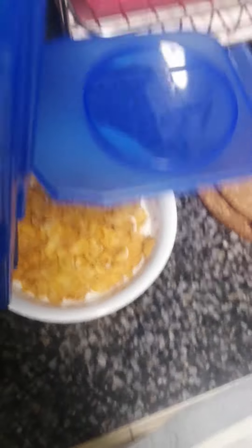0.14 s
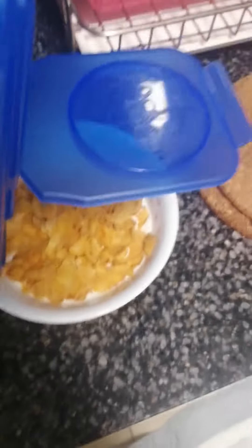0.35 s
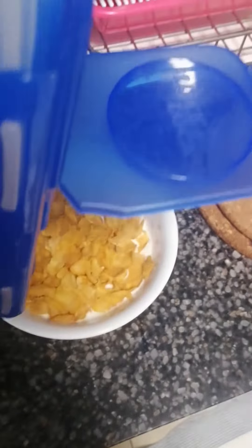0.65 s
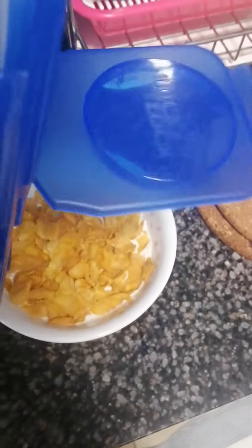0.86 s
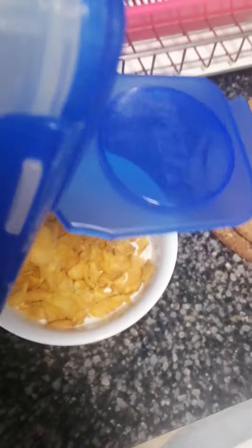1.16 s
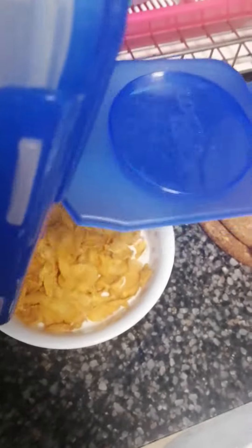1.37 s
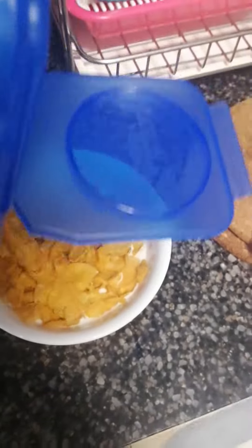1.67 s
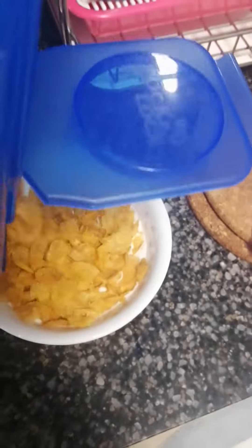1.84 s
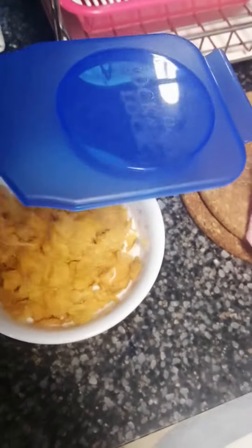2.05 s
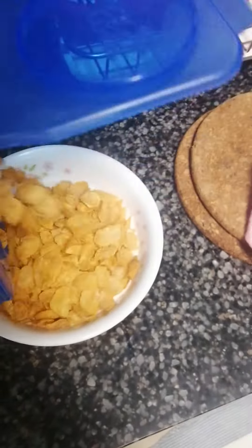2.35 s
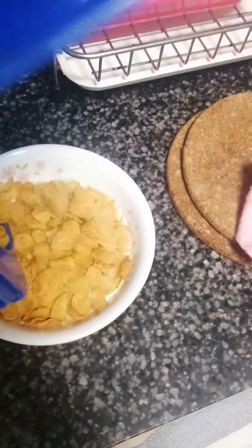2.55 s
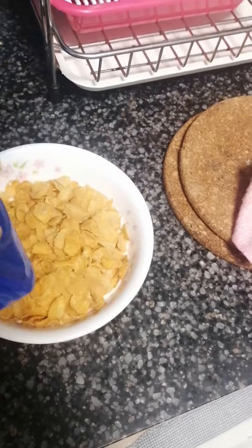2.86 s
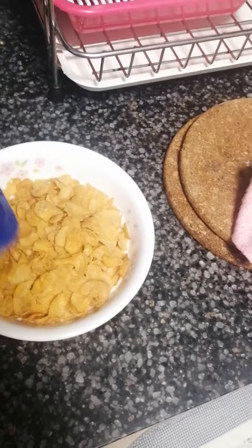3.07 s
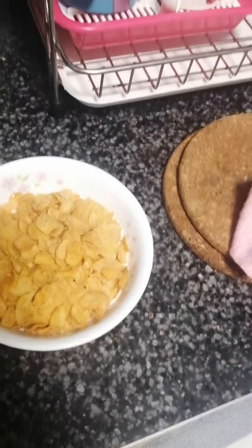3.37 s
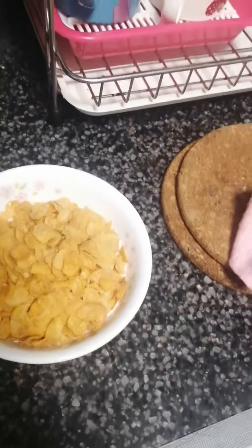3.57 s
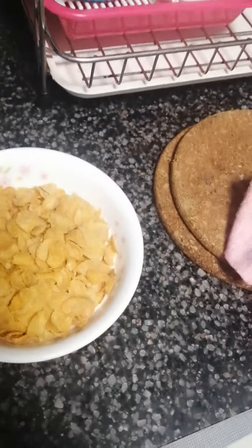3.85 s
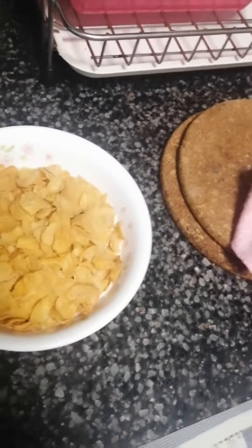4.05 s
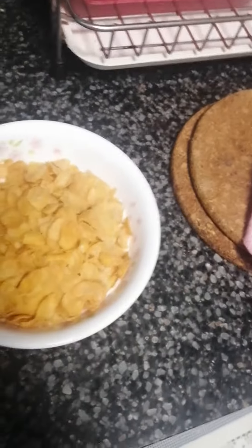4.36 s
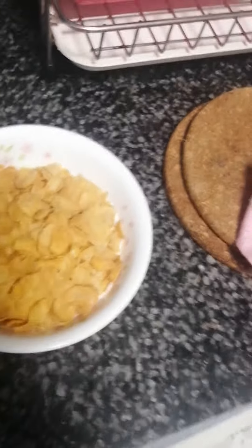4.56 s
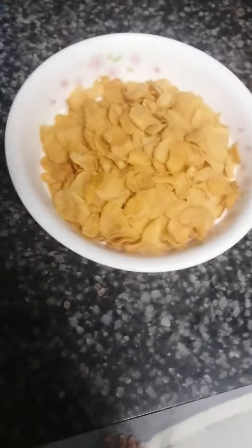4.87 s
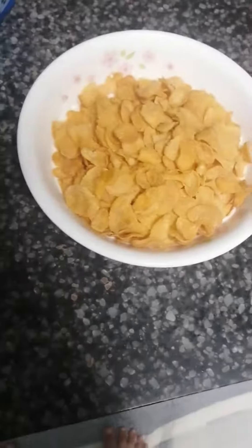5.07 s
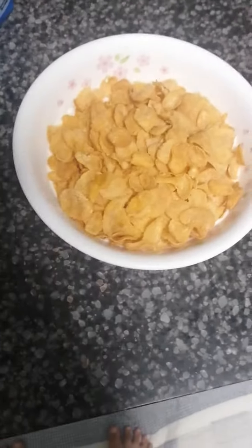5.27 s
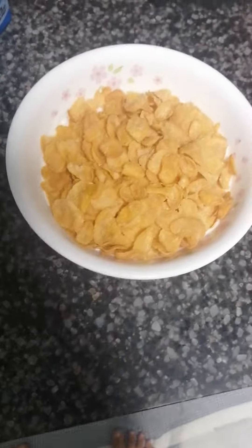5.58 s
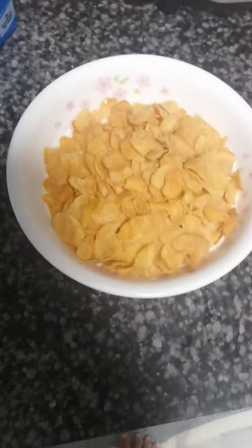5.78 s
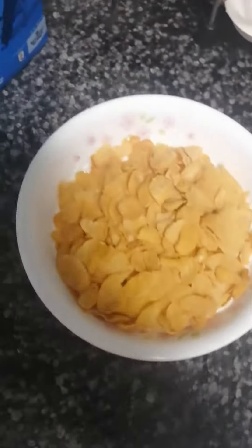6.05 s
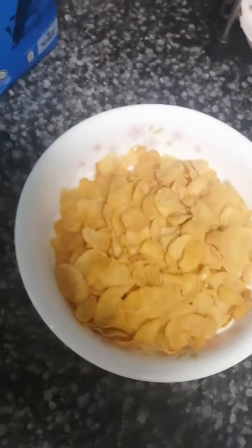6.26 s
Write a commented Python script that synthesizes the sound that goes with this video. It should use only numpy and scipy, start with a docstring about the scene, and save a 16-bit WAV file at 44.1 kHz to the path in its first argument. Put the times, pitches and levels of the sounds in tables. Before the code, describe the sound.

A close stereo pickup in a small, hard kitchen with a quiet low rumble. From 0 s, dry cornflakes spill in a short rush of crisp, bright ticks, strongest at once and thinning by 0.3 s. Plastic knocks cluster at 0.4-0.5 s, over a last small trickle. A faint muffled slide inside the container grows from 0.7 s to 1.3 s, then the second rush begins, dense and brittle from 1.6 to 2.7 s, with sharper flakes skittering as they land, slightly right. It dies into stray ticks by 3.1 s. Hollow container knocks with a low thud come at 3.55 and 3.86 s, weaker bumps at 4.16-4.36 s, amid soft hiss and fine crackles fading by 5 s. The lid flexes, clicks at 5.09 s and snaps hard at 5.19 s. A barely audible thin whistle follows around 5.5 s, then faint knocks at 5.6-5.9 s and near quiet until 6.4 s.

```python
"""A small hard kitchen: dry cornflakes slide from a plastic container onto the heap in a ceramic bowl, in two rushes.
Each flake contact is a short ringing tick, heard close by; strong landings add a skitter.
The container knocks on a stone counter: noise bursts drive its wall and rim modes, damped sines its boom.
Its lid flexes and snaps shut with air pulses, rings and cracks; a thin whistle and a few knocks follow.
Decaying diffuse noise is the room's answer; coloured noise gives the handling hiss and the low rumble."""
import sys
import numpy as np
from scipy import signal
from scipy.fft import rfft, irfft, next_fast_len
from scipy.io import wavfile
from scipy.ndimage import uniform_filter1d, map_coordinates

SR = 44100
rng = np.random.default_rng(int(sys.argv[2]) if len(sys.argv) > 2 else 0)


def to_wav(sig):
    """Store sig (one row per channel, or 1-D mono) as 16-bit WAV at the path in sys.argv[1].

    Samples outside -1..1 are clipped; the rate is SR.
    """
    pcm = np.clip(np.atleast_2d(sig), -1, 1) * 32767
    pcm = np.round(pcm).astype(np.int16)
    wavfile.write(sys.argv[1], SR, pcm.T)  # frames by channels


N = 283122


def amp(db):
    """Decibels to gain."""
    return 10 ** (np.asarray(db) / 20)


def unit(x):
    """Scale to rms 1."""
    return x / np.sqrt(np.mean(x ** 2) + 1e-20)


def unit_energy(x):
    """Scale each channel to energy 1."""
    return x / np.sqrt(np.sum(x ** 2, axis=-1, keepdims=True) + 1e-20)


def along(points, hz):
    """Read (Hz, value) points on a log frequency axis."""
    point_hz, value = np.transpose(points)
    return np.interp(np.log(hz + 1), np.log(point_hz + 1), value)


def curves(rows):
    """One value per sample for each column after the time."""
    s, *columns = np.transpose(rows)
    return [np.interp(np.arange(N) / SR, s, column) for column in columns]


def panned(balance_db):
    """Left and right gains for a left-minus-right level difference."""
    return amp(np.array([balance_db, -balance_db]) / 2).reshape(2, -1)


def add(track, s, sound):
    """Mix a sound in at a time."""
    start = max(round(s * SR), 0)
    part = track[..., start:start + sound.shape[-1]]
    part += sound[..., :part.shape[-1]]


def filtered(x, response):
    """Multiply the spectrum of x by a response of frequency."""
    n = x.shape[-1]
    padded = next_fast_len(n + SR // 4)
    spectrum = rfft(x, padded) * response(np.fft.rfftfreq(padded, 1 / SR))
    return irfft(spectrum, padded)[..., :n]


def coloured(x, spectrum):
    """Filter x by (Hz, gain dB) points."""
    return filtered(x, lambda hz: amp(along(spectrum, hz)))


def resonate(x, modes):
    """Pass x through parallel (Hz, width Hz, dB) resonances of alternating sign."""
    def response(hz):
        total = 0
        for k, (centre_hz, width_hz, db) in enumerate(modes):
            damping = 1j * hz * width_hz
            total = total + (-1) ** k * amp(db) * damping / (centre_hz ** 2 - hz ** 2 + damping)
        return total
    return filtered(x, response)


# Likeness of the two microphones in a diffuse field. Each row: frequency in Hz, correlation (0 to 1).
LIKENESS = [(60, 0.83), (290, 0.98), (640, 0.48), (1400, 0), (15000, 0.045)]


def diffuse(size):
    """Noise from all around: alike at both microphones in the bass, nearly unrelated in the treble."""
    def mid_side(hz):
        angle = np.arccos(np.clip(along(LIKENESS, hz), -1, 1)) / 2
        return np.array([np.cos(angle), np.sin(angle)])
    mid, side = filtered(rng.standard_normal((2, size)), mid_side)
    return np.array([mid + side, mid - side])


# Decay of the kitchen. Each row: frequency in Hz, time to fall by 60 dB in seconds.
KITCHEN_T60 = [(120, 0.47), (300, 0.39), (1000, 0.4), (4000, 0.39), (12000, 0.27)]


def reverb(x, build_s):
    """Kitchen tail: builds up quickly, each frequency dies at its own speed."""
    hz, t, bins = signal.stft(diffuse(size=SR // 2), SR, nperseg=256)
    decay = amp(-60 * t / along(KITCHEN_T60, hz)[:, None])
    tail = signal.istft(bins * decay, SR, nperseg=256)[1]
    tail = tail * (1 - np.exp(-np.arange(tail.shape[1]) / SR / build_s))
    return signal.fftconvolve(x, unit_energy(tail), axes=1)[:, :x.shape[1]]


def burst(decay_s):
    """A contact: decaying stereo noise of energy 1."""
    t = np.arange(SR // 2) / SR
    return unit_energy(diffuse(size=len(t)) * np.exp(-t / decay_s))


def ticks(times, sizes, pitch_hz, spread, cycles):
    """Each flake contact rings for a few cycles around a pitch, with its own phase at each microphone."""
    chance = rng.standard_normal((len(times), 3))
    hz = np.clip(pitch_hz * np.exp(spread * chance[:, 0]), 1000, SR / 2.2)[:, None]
    k = np.arange(SR // 200)
    fade = np.exp(-k / SR * hz / cycles)
    index = (times * SR).astype(int)[:, None] + k
    pair = []
    for phase in chance.T[1:]:
        ring = unit_energy(fade * np.sin(2 * np.pi * (hz * k / SR + phase[:, None])))
        pair.append(np.bincount(index.ravel(), (ring * sizes[:, None]).ravel(), N)[:N])
    return np.array(pair)


# Background level. Each row: time in seconds, level in dB.
BACKGROUND_LEVEL = [(0, -54), (.8, -49), (1.25, -49), (1.5, -53.5), (2.5, -56), (3.2, -50), (4.7, -49),
                    (5.5, -52.5), (6.4, -54)]
# Background spectrum. Each row: frequency in Hz, relative gain in dB.
RUMBLE_COLOUR = [(13, -46), (22, -3), (50, -9), (76, 0.5), (100, -5.5), (131, -8), (159, -0.5), (192, -5),
                 (489, -7), (1050, -9), (2090, -22.5), (4390, -34), (4900, -33.5), (10600, -46),
                 (15500, -61)]


def background():
    """The kitchen's low rumble: diffuse noise, mostly bass, a little stronger on the right."""
    level_db, = curves(BACKGROUND_LEVEL)
    return amp(level_db) * unit(coloured(diffuse(size=N), RUMBLE_COLOUR)) * panned(balance_db=-2.5)


def hiss(levels, spectrum):
    """Coloured diffuse noise that swells and fades along (s, dB) points."""
    level_db, = curves(levels)
    t = np.arange(N) / SR
    gate = np.clip(np.minimum(t - levels[0][0], levels[-1][0] - t) * 20, 0, 1)
    return gate * amp(level_db) * unit(coloured(diffuse(size=N), spectrum))


# Flakes sliding inside the container. Each row: time in seconds, level in dB.
SLIDE_LEVEL = [(.68, -74), (.9, -64.5), (1.2, -59), (1.35, -62.5)]
# Its spectrum behind the wall. Each row: frequency in Hz, relative gain in dB.
SLIDE_SPECTRUM = [(900, -12), (1800, -12), (2400, 1.5), (3000, -1), (3500, -24), (5500, -8.5), (8300, -25),
                  (10000, -6), (12500, -25), (15400, -25)]


def slide():
    """Flakes slide inside the tilting container, muffled by its wall."""
    return hiss(SLIDE_LEVEL, SLIDE_SPECTRUM) * panned(balance_db=-3.5)


# Hiss of handling. Each row: time in seconds, level in dB.
RUSTLE_LEVEL = [(3.281, -88), (3.51, -53.5), (3.9, -54), (4.25, -45.5), (4.56, -58), (5.0, -67.5)]
# Its spectrum. Each row: frequency in Hz, relative gain in dB.
RUSTLE_SPECTRUM = [(880, -5), (1500, -22), (1790, -14.5), (2370, -8), (3410, -14.5), (4350, -12),
                   (6100, -14), (7400, -11.5), (8350, -18), (9500, -11), (12300, -21), (15200, -29)]


def rustle():
    """A soft smooth hiss while the container is handled."""
    return hiss(RUSTLE_LEVEL, RUSTLE_SPECTRUM) * panned(balance_db=1.2)


def shifting(over_rustle_db, scatter_db, count):
    """Flakes left in the container shift with fine crackles that follow the rustle's level."""
    s, db = np.transpose(RUSTLE_LEVEL)
    times = rng.uniform(s[1], s[-1], count)
    sizes = amp(np.interp(times, s, db) + over_rustle_db + scatter_db * rng.standard_normal(count))
    return ticks(times, sizes, pitch_hz=7940, spread=0.44, cycles=2.5)


# Air through the seal of the shut lid. Each row: time in seconds, pitch in Hz, level in dB rms.
SEAL_WHISTLE = [(5.39, 5400, -93), (5.425, 5600, -80), (5.478, 5680, -80), (5.53, 5540, -80.5),
                (5.565, 5150, -89)]


def whistle(waver):
    """A faint thin tone that arches up and sinks as the pressure under the lid evens out."""
    hz, db = curves(SEAL_WHISTLE)
    t = np.arange(N) / SR
    hz = hz * (1 + waver * unit(uniform_filter1d(rng.standard_normal(N), size=150)))
    gate = np.clip(np.minimum(t - SEAL_WHISTLE[0][0], SEAL_WHISTLE[-1][0] - t) * 100, 0, 1)
    return gate * amp(db) * np.sqrt(2) * np.sin(2 * np.pi * np.cumsum(hz) / SR)


def boom(hz, rise_s, decay_s):
    """The broad panels and the air inside swing together: a damped sine of energy 1."""
    t = np.arange(SR // 2) / SR
    return unit_energy(np.sin(2 * np.pi * hz * t) * (1 - np.exp(-t / rise_s)) ** 2 * np.exp(-t / decay_s))


# Soft pushes on the plastic. Each row: time in seconds, relative level in dB, pitch in Hz.
FLEX_PULSES = [(3.991, -25.5, 207), (4.154, -33, 225.5), (4.92, -31, 221), (5.037, -22.5, 214),
               (5.117, -19, 228), (5.17, -22, 243)]


def flexes():
    """Under the hand the plastic gives way and pumps the air inside: soft hollow pulses."""
    out = np.zeros((2, N))
    for s, db, hz in FLEX_PULSES:
        add(out, s - .002, amp(db + 22.5) * boom(hz, rise_s=0.013, decay_s=0.0074))
    return out + amp(-5.5) * reverb(out, build_s=0.0019)


# Container position. Each row: time in seconds, left minus right in dB.
CONTAINER_PLACE = [(4.4, -7.5), (5.0, -1.5)]


def place(s):
    """Balance in dB as the container moves from the right towards the middle."""
    return np.interp(s, *np.transpose(CONTAINER_PLACE))


# A plastic contact is too slow to drive the highest modes. Each row: frequency in Hz, relative gain in dB.
CONTACT_COLOUR = [(3000, 4), (5000, -8.5), (9000, -14), (15400, -38.5)]
DIRECT_DB = 0  # clean first push over the chatter


def struck(modes, centre_hz, rise_s, decay_s):
    """A blow is one clean push and a short chatter; its spot favours the modes around one frequency."""
    chatter = burst(decay_s)
    force = unit_energy(chatter * (1 - np.exp(-np.arange(chatter.shape[1]) / SR / rise_s)))
    force[:, round(rise_s * SR)] += amp(DIRECT_DB)
    spot = [(centre_hz, 1.24 * centre_hz, 0)]
    push = resonate(resonate(coloured(force, CONTACT_COLOUR), spot), spot)
    return unit_energy(resonate(push, modes))


GRIP_DETUNE = 0.049  # spread of each mode's log frequency from blow to blow


def gripped(modes):
    """The container's modes, each a little retuned by the hand and the flakes inside."""
    return [(hz * np.exp(GRIP_DETUNE * rng.standard_normal()), width, db) for hz, width, db in modes]


# Container wall resonances. Each row: frequency in Hz, width in Hz, relative level in dB.
WALL_MODES = [(392, 90, 2), (469, 113, 3), (580, 137, 1.5), (708, 228, -2), (895, 255, -1), (1054, 190, -7)]
# Lid resonances. Each row: frequency in Hz, width in Hz, relative level in dB.
LID_MODES = [(1470, 77, 14), (1870, 160, 1), (2120, 97, 8.5), (2420, 210, 0), (2650, 110, 0.5),
             (3520, 460, -3), (4300, 660, -3.5)]
# Spectrum of the lid's crack. Each row: frequency in Hz, relative gain in dB.
LID_CRACK_COLOUR = [(800, 6), (3500, 1.5), (5000, 2), (7500, -4.5), (11000, -8), (15400, -40)]
# The lid catches, slips and seats. Each row: time in seconds, then levels of push, wall, ring and crack in dB.
LID_SNAPS = [(4.923, -31.5, -24.5, -27.5, -35), (5.0866, -27, -31, -10, -37), (5.0894, -8, -11, -7, -18),
             (5.0931, -30, -14, -4, -14), (5.164, -22, -16, -22, -22), (5.192, 6, 2.5, -8.5, 2)]


def snaps(push_s):
    """Each jump of the lid gives one sharp push of air and a crack, and rings the lid and the walls."""
    out = np.zeros((2, N))
    u = np.arange(SR // 2) / SR / push_s
    push = unit_energy((1 - u) * np.exp(-u) * (1 - np.exp(-u * 8)) ** 2)
    for s, push_db, wall_db, ring_db, crack_db in LID_SNAPS:
        wall = struck(WALL_MODES, centre_hz=630, rise_s=0.00038, decay_s=0.00055)
        body = amp(push_db) * push + amp(wall_db) * wall
        ring = amp(ring_db) * struck(LID_MODES, centre_hz=2480, rise_s=.0001, decay_s=0.0018)
        crack = amp(crack_db) * unit_energy(coloured(burst(decay_s=0.0032), LID_CRACK_COLOUR))
        room = reverb(amp(-6) * body + amp(-2) * ring + amp(-10) * crack, build_s=0.001)
        add(out, s, (body + ring + crack + room) * panned(place(s)))
    return out


# Stiff rim resonances. Each row: frequency in Hz, width in Hz, relative level in dB.
RIM_MODES = [(1254, 160, 6.5), (1480, 166, 4.5), (1660, 120, -2), (2060, 600, -3.5), (2630, 330, -1),
             (3080, 210, 0), (3450, 420, -3), (4000, 700, -7)]
# Counter resonances. Each row: frequency in Hz, width in Hz, relative level in dB.
COUNTER_MODES = [(69, 5.2, 4.5), (123.2, 8.5, 7), (160.7, 9.4, 6)]
# Spectrum of a hard contact. Each row: frequency in Hz, relative gain in dB.
CRACK_COLOUR = [(1500, 3), (3400, 2.5), (4200, 0), (5000, 2.5), (7500, -5.5), (11000, -16.5), (15400, -45)]
# Blows on the container. Each row: time in seconds, strength in dB, struck spot, rim and boom in Hz,
# then relative levels of rim, crack and boom in dB.
CONTAINER_KNOCKS = [ (0.3863, -21.5, 1010, 2800, 282, -9, -2.5, -2),
                    (0.4398, -3.5, 705, 2850, 220, -8, -1, 6.5),
                    (0.5013, 2.5, 820, 1930, 230, -13.5, -17, -11),
                    (0.5105, -10.5, 815, 1400, 248, -14, -29, -1),
                    (0.5184, -6, 800, 1400, 250, -8, -28, -6),
                    (3.5492, -1.5, 540, 1530, 272.5, -7, -12.5, 15.5),
                    (3.5585, -11.5, 557, 1860, 314, -1.5, -9, 7), (3.8556, 3, 535, 2180, 248, -8.5, -15, 7),
                    (3.879, 0.5, 570, 1500, 240, -16, -34, -14),
                    (4.161, -17.5, 446, 1394, 196, -3.5, -28, 4), (4.1845, -24.5, 520, 2210, 172, 7, 4, 0),
                    (4.3175, -9.5, 510, 1390, 247, -9, -25, 4.5),
                    (4.340, -10, 510, 1400, 226, -18, -25, 6.5),
                    (4.364, -19, 497, 1400, 244, -18, -23, 6.5),
                    (5.578, -31.5, 462, 2020, 258, -2.5, -9, 20),
                    (5.7734, -17.5, 950, 1500, 210, -14, -27, -8),
                    (5.8258, -14.5, 484, 1710, 272, -11, -24.5, 7),
                    (5.923, -30.5, 388, 1300, 148, -12, -17, -18)]
SOFT_SPOT_HZ, THUD_DB, THUD_DB_PER_OCTAVE = 507, 6.5, -29  # stiffer spots pass less into the counter


def knocks():
    """Every blow sets off boom, walls and rim; soft spots shake the counter, hard contacts add a crack."""
    out = np.zeros((2, N))
    for s, db, spot_hz, rim_hz, boom_hz, rim_db, crack_db, boom_db in CONTAINER_KNOCKS:
        low = amp(boom_db) * boom(boom_hz, rise_s=0.0023, decay_s=0.0049)
        thud_db = THUD_DB + THUD_DB_PER_OCTAVE * np.log2(spot_hz / SOFT_SPOT_HZ)
        counter = resonate(boom(180, rise_s=0.00092, decay_s=0.0013), COUNTER_MODES)
        thud = amp(thud_db) * unit_energy(counter)
        wall = amp(-0.5) * struck(gripped(WALL_MODES), spot_hz, rise_s=0.00061, decay_s=0.0079)
        rim = amp(rim_db) * struck(gripped(RIM_MODES), rim_hz, rise_s=0.00045, decay_s=0.011)
        crack = amp(crack_db) * unit_energy(coloured(burst(decay_s=0.0033), CRACK_COLOUR))
        high = wall + rim + crack
        # the panels radiate into the room over a wider band than the boom heard up close
        room_boom = amp(boom_db - 5.0) * boom(boom_hz, rise_s=0.0016, decay_s=0.0022)
        room = reverb(room_boom + amp(-3.0) * high, build_s=0.0032)
        blow = amp(db) * (low + high + thud + room)
        # share of the balance by frequency: long waves reach both microphones almost equally
        balance_share = [(100, 0.26), (300, 0.72), (600, 1.22), (2500, 0.13)]
        add(out, s, filtered(blow, lambda hz: panned(place(s) * along(balance_share, hz))))
    return out


# First rush of flakes. Each row: time in seconds, relative level in dB.
FIRST_FLOW = [(0, -43), (.05, -40.5), (.12, -48.5), (.2, -52), (.3, -68), (.35, -59), (.42, -71),
              (.46, -52.5), (.58, -57), (.65, -73)]
# Second rush of flakes. Each row: time in seconds, relative level in dB.
SECOND_FLOW = [(.8, -77), (1.18, -65), (1.26, -48.5), (1.3, -54.5), (1.35, -52), (1.44, -57), (1.6, -46.5),
               (1.67, -42.5), (1.88, -47), (2.03, -40.5), (2.34, -39), (2.57, -41.5), (2.63, -48),
               (2.73, -43.5), (2.831, -63.5), (2.97, -54.5), (3.149, -80)]


def flow():
    """The stream's level in dB, with a thin trickle between the rushes, and whether it still runs."""
    level_db, = curves(np.vstack([FIRST_FLOW, SECOND_FLOW]))
    return level_db, np.arange(N) / SR < SECOND_FLOW[-1][0]


# Contact pitch, mostly lower as bigger pieces come down. Each row: time in seconds, pitch in Hz.
GRAIN_PITCH = [(0, 7660), (1.3, 6600), (1.8, 7360), (2.5, 6300), (3.0, 5860)]


def stream(per_second, scatter_db, clump_db):
    """A stronger flow has more contacts; their sizes scatter and swell in clumps."""
    level_db, running = flow()
    pitch_hz, = curves(GRAIN_PITCH)
    t = np.arange(N) / SR
    rate = per_second * amp(level_db - level_db.max()) ** .15 * running
    at = np.flatnonzero(rng.random(N) < rate / SR)
    clumps = map_coordinates(rng.standard_normal(N // 100), [t[at] * 70], mode="mirror")
    scatter = np.minimum(rng.standard_normal(len(at)), 2)
    sizes = unit(amp(scatter_db * scatter + clump_db * clumps))
    sizes = sizes * amp(level_db[at]) * np.sqrt(SR / rate[at])
    return ticks(t[at], sizes, pitch_hz[at], spread=0.5, cycles=1.15)


def strays(over_flow_db, skitter_s, pitch_hz, spread, count):
    """Lesser landings at random moments that follow the flow's level, as rows like the hard landings."""
    level_db, running = flow()
    at = (rng.random(count) * running.sum()).astype(int)
    hz = pitch_hz * np.exp(spread * rng.standard_normal(count))
    return np.column_stack([at / SR, level_db[at] + over_flow_db, np.full(count, skitter_s), hz])


# Flakes that land hard. Each row: time in seconds, relative level in dB, skitter in seconds, pitch in Hz.
HARD_FLAKES = [(0.0415, -8.5, 0.005, 6400.0), (0.1045, -16.5, 0.001, 11800.0), (0.1663, -16.5, 0.004, 9050),
               (0.254, -25, 0.0045, 7800.0), (0.3162, -23, 0.002, 9800), (0.3225, -24.5, 0.004, 10100.0),
               (0.4642, -19, 0.003, 9200), (0.8445, -31, 0.004, 5050), (1.3015, -13.5, 0.003, 9100),
               (1.3285, -13.5, 0.01, 7600), (1.4458, -15, 0.0045, 10200.0), (1.4825, -16.0, 0.003, 10900.0),
               (1.49, -17, 0.003, 9700.0), (1.494, -11, 0.003, 9100.0), (1.5125, -18.5, 0.005, 7900),
               (1.54, -11.5, 0.002, 8400), (1.5437, -17, 0.004, 9600), (1.5748, -10.5, 0.006, 8460),
               (1.6015, -12.0, 0.004, 6200.0), (1.634, -12.0, 0.005, 6000.0), (1.6503, -16, 0.007, 7800.0),
               (1.659, -8.5, 0.004, 7800.0), (1.6655, -12, 0.004, 4500.0), (1.7032, -18, 0.0035, 7000.0),
               (1.7133, -12, 0.005, 7700), (1.7416, -11.5, 0.005, 4800.0), (1.778, -13, 0.004, 7700.0),
               (1.801, -10.5, 0.004, 7700.0), (1.842, -15, 0.007, 8400.0), (1.91, -16, 0.002, 10000.0),
               (1.9265, -15, 0.0045, 7100.0), (1.9425, -11, 0.005, 6600.0), (1.9796, -18, 0.004, 10600.0),
               (1.998, -18, 0.002, 10400.0), (2.031, -11.5, 0.006, 7400.0), (2.078, -15, 0.002, 11100.0),
               (2.114, -12, 0.008, 7700), (2.158, -12, 0.01, 8200), (2.221, -18, 0.003, 7600.0),
               (2.258, -7, 0.007, 7100.0), (2.2915, -23, 0.004, 4300.0), (2.325, -9.5, 0.012, 10100.0),
               (2.4055, -15, 0.002, 8600.0), (2.4333, -15, 0.005, 7100.0), (2.476, -12.5, 0.002, 9800.0),
               (2.4974, -17, 0.0015, 5700.0), (2.5356, -12, 0.004, 6300.0), (2.554, -7.5, 0.011, 5100.0),
               (2.6543, -14.5, 0.0012, 8900), (2.6887, -16.5, 0.003, 8800.0),
               (2.7112, -14.5, 0.0035, 9800.0), (2.876, -15.5, 0.004, 10100.0), (2.8868, -15, 0.001, 10000),
               (2.9225, -28, 0.002, 10300.0), (2.9322, -17.5, 0.001, 8900.0), (2.9935, -26, 0.012, 10500.0),
               (4.4757, -26.5, 0.002, 6950), (4.6, -35, 0.002, 5700.0)]
FIRST_SHARE_S = 0.001  # a skitter this long carries the first contact's energy; longer ones carry more


def landings(contact_s, count):
    """A flake lands on its edge, then skitters as it settles; all its contacts ring near its own pitch."""
    stray_rows = strays(over_flow_db=16, skitter_s=.0012, pitch_hz=7500, spread=.35, count=130)
    s, db, skitter_s, hz = np.vstack([HARD_FLAKES, stray_rows]).T[:, :, None]
    first = np.arange(count) < count // 4
    delay = rng.exponential(size=(len(s), count)) * np.where(first, contact_s, skitter_s)
    skitter_share = np.sqrt(skitter_s / FIRST_SHARE_S) * unit_energy(1. * ~first)
    shares = unit_energy(unit_energy(1. * first) + skitter_share)
    sizes = (amp(db + 2.0) * shares).ravel()
    return ticks((s + delay).ravel(), sizes, np.repeat(hz, count), spread=.3, cycles=4.5)


# Spectrum of the flakes. Each row: frequency in Hz, relative gain in dB.
FLAKE_COLOUR = [(700, -13), (1500, -8.5), (2100, -6.5), (2700, -1.5), (3350, -4.5), (4200, -0.5),
                (6000, -3.5), (7400, -0.5), (8600, -4), (10800, -0.5), (13000, -6), (15400, -14)]
# The bowl is nearer the right microphone. Each row: frequency in Hz, left minus right in dB.
BOWL_PLACE = [(1300, -1), (2400, -2), (3200, -1), (4200, -9.5), (5800, -4), (7800, -7.5), (9500, -9),
              (11500, -12), (15000, -8.5)]


def cornflakes():
    """The flakes rattle on the heap, close by, with a little of the kitchen behind them."""
    near = amp(1.0) * stream(per_second=1500, scatter_db=0.5, clump_db=2.0)
    near = near + landings(contact_s=0.00027, count=20)
    near = filtered(coloured(near, FLAKE_COLOUR), lambda hz: panned(along(BOWL_PLACE, hz)))
    return near + amp(-5.5) * reverb(near, build_s=0.00096)


def scene():
    """Flakes, container and lid over the kitchen's background."""
    handling = slide() + rustle() + shifting(over_rustle_db=15, scatter_db=2.5, count=170)
    lid = flexes() + snaps(push_s=0.00087) + whistle(waver=.003)
    return background() + handling + lid + knocks() + cornflakes()


TOP_HZ = 15400


def record(dry):
    """The recorder keeps nothing above its band limit."""
    return filtered(dry, lambda hz: hz < TOP_HZ)


dry = scene()
out = record(dry)
to_wav(out)
```